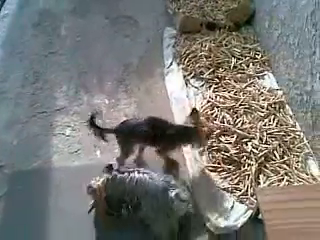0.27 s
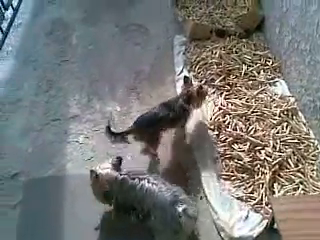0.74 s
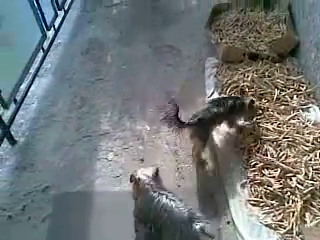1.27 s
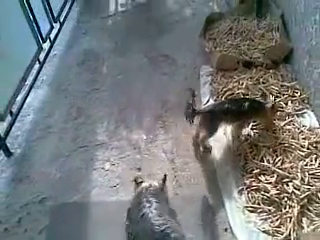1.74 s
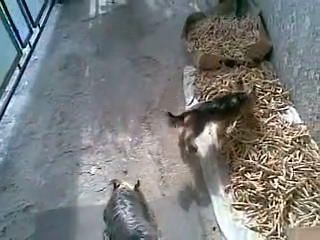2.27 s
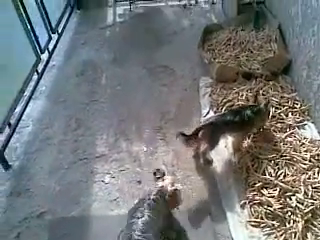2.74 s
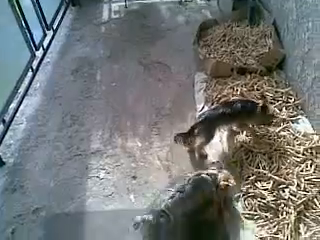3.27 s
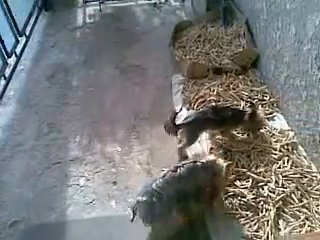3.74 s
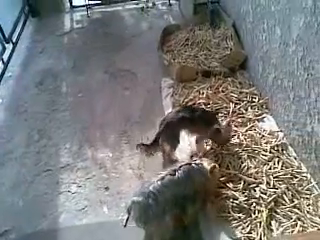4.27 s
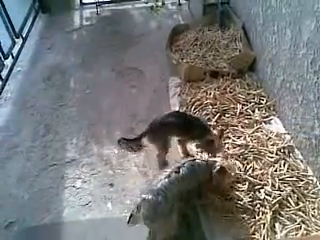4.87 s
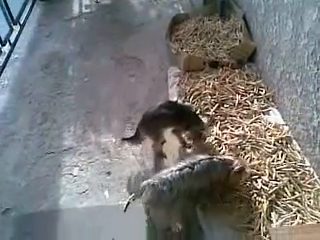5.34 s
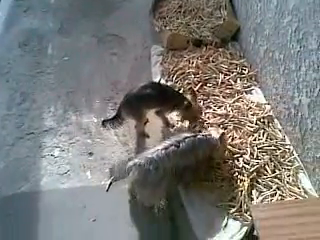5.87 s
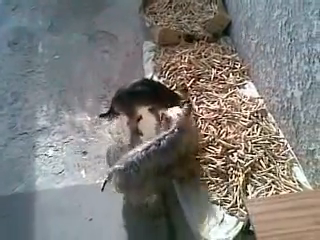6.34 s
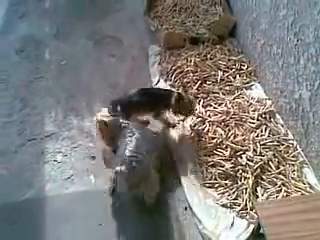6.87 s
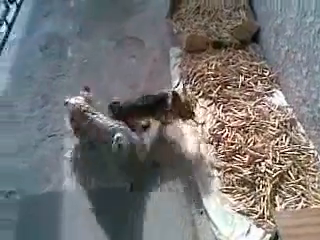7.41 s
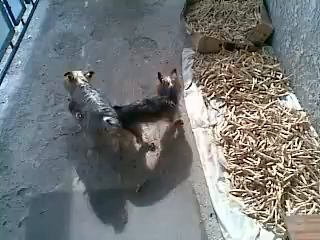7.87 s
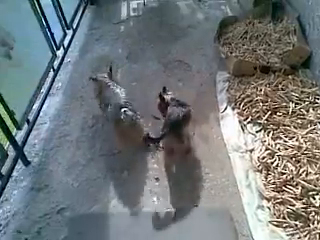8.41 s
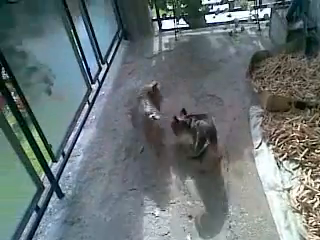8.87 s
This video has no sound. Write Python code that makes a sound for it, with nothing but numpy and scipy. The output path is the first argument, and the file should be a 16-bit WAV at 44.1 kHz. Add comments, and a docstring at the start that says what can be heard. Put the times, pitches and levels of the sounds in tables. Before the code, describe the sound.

Dry pods crackle under sniffing small dogs, with scattered claw clicks and soft paw taps over a faint distant town hum.

```python
"""Dry pods snap and rustle as two small dogs sniff and root in a heap of them on a sack; claws tick, paws tap.
The pods scrape over each other as the dogs nudge them, and each sniff rings in a dog's nose.
We are on a concrete balcony: the walls answer briefly, the town hums far off, and late on come faint
distant pips and a low drone. The mono camera microphone hisses; its gain dips after loud moments."""
import sys
import numpy as np
from scipy import signal
from scipy.fft import rfft, irfft, next_fast_len
from scipy.io import wavfile
from scipy.ndimage import uniform_filter1d, map_coordinates

SR = 44100
rng = np.random.default_rng(int(sys.argv[2]) if len(sys.argv) > 2 else 0)


def materialize(psi):
    """Save the field psi as 16-bit PCM at rate SR to the path in sys.argv[1].

    A 1-D psi becomes a single channel; in a 2-D psi each row is a channel.
    """
    bounded = np.clip(np.atleast_2d(psi).T, -1, 1)
    quanta = np.round(bounded * 32767).astype(np.int16)
    wavfile.write(sys.argv[1], SR, quanta)


N = 402633

# Spectrum of the far town hum and the camera hiss: frequency_hz, density_db
AMBIENCE_SPECTRUM = [(12, -12), (20, 7), (44, 2), (98, -5), (285, -6), (698, -10.5), (1810, -16.5),
                     (3070, -20.5), (3950, -19.5), (6540, -25.5), (9140, -18.5), (14700, -15.5),
                     (16000, -11)]
# Slow drift of that hum and hiss: time_s, gain_db
AMBIENCE_DRIFT = [(0, 0.5), (3, 0), (6, 1), (9.13, 2)]
# Spectrum of pods scraping together: frequency_hz, density_db
RUSTLE_SPECTRUM = [(470, -17.5), (850, -12), (1210, -8), (3600, -4.5), (4290, -3), (7170, -3.5), (7930, 0),
                   (10300, -1), (13600, -15), (15000, -30), (16000, -33)]
# Nasal resonances of the dogs' sniffs, odd modes of a closed tube: pitch_hz, width_hz, level_db
SNIFF_MODES = [(1445, 400, 3), (4400, 1400, -8), (7170, 1200, -5)]
# Faint stirring and sniffing between the louder moments: time_s, rustle_db, sniff_db
STIRRING = [(0, -53.5, -66), (1.4, -54, -78), (1.6, -60, -59), (5, -59, -75), (6.4, -75, -60.5),
            (7, -55, -77), (7.3, -52.5, -78), (8.1, -51, -75), (8.4, -55, -53.5), (9.13, -52, -55.5)]
# A dog sniffs, snorts or nudges the pods: peak_s, rustle_db, rise_s, fall_s, sniff_db
SNIFFS_AND_NUDGES = [(1.575, -43, 0.03, 0.061, -53), (1.69, -38.5, 0.076, 0.069, -61),
                     (1.84, -36.5, 0.066, 0.065, -46.5), (2.0, -40.5, 0.15, 0.093, -48.5),
                     (2.07, -42.5, 0.057, 0.057, -65), (2.19, -39.5, 0.094, 0.23, -51),
                     (2.38, -41.5, 0.081, 0.39, -49.5), (2.53, -42.5, 0.09, 0.06, -60),
                     (2.64, -45.5, 0.044, 0.13, -68), (2.845, -37, 0.1, 0.088, -61),
                     (2.98, -37.5, 0.077, 0.082, -61), (3.11, -43, 0.099, .2, -61),
                     (3.225, -38, 0.18, 0.11, -61), (3.511, -32, 0.14, 0.14, -48.5),
                     (3.598, -25.5, 0.024, 0.057, -55), (3.69, -35, 0.13, 0.049, -50),
                     (3.747, -25, 0.013, 0.049, -52), (3.796, -19.5, .02, .1, -43),
                     (3.845, -19, 0.066, 0.043, -38), (3.89, -31.5, .04, 0.14, -44),
                     (4.06, -48.5, .05, 0.11, -51), (4.16, -38, 0.14, .1, -54),
                     (4.275, -30, 0.052, 0.048, -49), (4.43, -39.5, 0.18, 0.068, -42.5),
                     (4.52, -35.5, 0.11, 0.083, -44.5), (4.71, -38, 0.2, 0.18, -53),
                     (4.79, -37.5, .1, 0.086, -56), (4.911, -29, 0.12, 0.078, -52),
                     (5.04, -39.5, .15, 0.15, -51), (5.2, -44.5, 0.087, 0.36, -48),
                     (5.37, -41, 0.35, .08, -65), (5.55, -42.5, 0.16, 0.13, -50),
                     (5.641, -36.5, 0.057, 0.18, -43), (5.78, -43.5, 0.081, .2, -48.5),
                     (5.971, -35.5, .17, 0.096, -44), (6.08, -42.5, .1, 0.093, -46.5),
                     (6.2, -40.5, .06, 0.12, -48), (6.26, -34.5, 0.096, .12, -46),
                     (6.4, -38, 0.11, 0.097, -45), (6.445, -33.5, 0.042, 0.052, -47),
                     (6.54, -39, 0.13, 0.077, -54), (6.705, -29.5, .07, 0.056, -59),
                     (6.645, -38.5, 0.043, .1, -61), (6.79, -40.5, .1, 0.22, -50),
                     (6.9, -48, 0.027, 0.074, -57), (7.08, -38.5, 0.028, 0.061, -65),
                     (7.56, -40, 0.035, 0.083, -43), (7.61, -46, .04, 0.033, -44),
                     (7.68, -39, 0.029, 0.037, -55), (7.8, -41.5, 0.014, 0.041, -66),
                     (7.94, -47.5, 0.034, .1, -58), (8.15, -39.5, 0.025, 0.093, -60),
                     (8.25, -34, 0.022, 0.067, -46.5), (8.335, -41, 0.022, 0.045, -41.5),
                     (8.37, -36, 0.054, 0.15, -43), (8.45, -38.5, .05, 0.051, -56),
                     (8.538, -29, 0.05, 0.12, -54), (8.686, -36, .033, 0.08, -40),
                     (8.88, -32, 0.027, 0.043, -47), (8.84, -46, 0.27, 0.11, -58),
                     (9.11, -47.5, 0.37, 0.041, -60)]
# Pod snaps and claw ticks: start_s, peak_db, low_ring_hz, low_ring_db, high_ring_hz, high_ring_db, tail_db
SNAPS_AND_TICKS = [(.1515, -30, 2120, -7, 5500, 3, -6), (.1625, -33, 2100, 11, 5540, -8, -8),
                   (.3999, -24, 2200, -7, 5440, 1.5, -5.5), (0.5094, -40, 2220, 16, 3880, 0, -12),
                   (.58, -23.5, 1390, -6, 8800, 2, -9), (0.812, -33, 2410, -6, 8850, 19, -15),
                   (.885, -35, 1500, -6, 9500, -4, -6), (0.949, -24.5, 1660, -6, 4030, -2, -3),
                   (1.016, -34, 2280, 10, 4050, 11, -7), (1.065, -24.5, 1970, -7, 7560, -25, -2),
                   (1.293, -35, 1730, 8, 8600, -4, -7), (1.5545, -34, 1840, 5, 9050, 0, 7),
                   (1.651, -18, 1770, -2, 3100, 0, -8.5), (1.68, -32, 1720, 10, 3160, 8, 2),
                   (1.792, -27, 1330, -8, 9510, -4, -10), (1.9539, -31.5, 1890, -3, 3670, 13, -6),
                   (2.359, -29, 1260, 10, 8960, 2, -4), (2.836, -22.5, 1870, 5.5, 3200, 4, -14),
                   (2.977, -27, 2280, -4, 8650, 3, 0), (3.46, -24, 1750, -3, 8700, 17, 0),
                   (3.591, -11, 2410, -10, 9100, -2, -2), (3.7373, -5, 2220, -16, 8000, -21, -4),
                   (3.741, -4, 1280, -5, 7060, -8, -21), (3.7793, -8.5, 1430, -16, 8340, 8, -3),
                   (3.7842, -4.5, 2200, -9, 9900, 10, -5), (3.7914, -7, 1810, -3, 9860, 2, -11),
                   (3.7994, -15, 1970, -10, 9320, 0, -14), (3.8131, -8, 1620, -17, 9100, -8, 4),
                   (3.8172, -2.5, 2160, -12, 7800, -4, -1), (3.885, -17, 2030, -9, 10100, 6, -9),
                   (4.2417, -26, 2100, 11, 8800, 9, -2), (4.4176, -20.5, 1350, -18, 4700, -4, 3),
                   (4.6968, -20.5, 2410, -5, 8010, -4, -6), (4.8343, -20, 1570, 1, 5100, 0, -1),
                   (5.0323, -25, 1310, -11, 9940, -7, 8), (5.154, -27.5, 1480, -21, 8650, 7, 3),
                   (5.199, -30.5, 1360, -1, 8150, -2, 5), (5.623, -27, 1480, -14, 6600, -3, 5),
                   (6.3269, -25, 1600, -8, 8500, -2, -2), (6.4311, -19.5, 1180, -2, 5170, 3, -6),
                   (6.6267, -26, 2320, 0, 2900, 1.5, -7), (6.8898, -20.5, 1620, 7.5, 4310, 9.5, -7.5),
                   (7.0667, -30, 1280, -5, 9200, 18, 20), (7.1416, -32.5, 2490, 0, 9300, 2, -4),
                   (7.3052, -27, 2490, -17, 9600, 15, -15), (7.3386, -27.5, 2180, -11, 6100, -5, 2),
                   (7.3656, -29.5, 1850, -14, 9820, -3, 1), (7.3902, -24.5, 1570, -18, 9100, 11, -13),
                   (7.5403, -17.5, 1330, 0, 9040, 3, -10), (7.5484, -19.5, 1820, 15, 6800, 4, -8),
                   (7.5812, -18.5, 1460, 4.5, 4420, 8, -3), (7.6598, -20, 1680, 15, 7300, 4, -13.5),
                   (7.7925, -21, 1900, -6, 3380, -1, -4.5), (7.835, -22, 1870, -23, 9000, 0, -2),
                   (7.838, -16, 1870, -25, 9000, 2, -11), (7.9311, -30, 1800, 2, 3390, 6, -8),
                   (8.1443, -29, 1470, 2, 4770, 3, -14), (8.232, -23.5, 1660, 7, 4370, -4, -1),
                   (8.3411, -22, 1550, 7, 3470, -1, 3), (8.3812, -21.5, 1730, 12, 7370, 17, -5.5),
                   (8.4371, -23, 1820, 11.5, 7140, -1, -14), (8.469, -21, 1670, -30, 9750, 4, -3),
                   (8.496, -28, 1500, -13, 9000, 2, -11), (8.512, -19, 1970, 1, 4140, -1, 15),
                   (8.5235, -7, 2070, -10, 4870, -11, -9), (8.552, -23, 2050, -10, 7200, 14, -22),
                   (8.5842, -25, 1480, 7, 2970, -2, 2), (8.6794, -24, 1400, 3.5, 4080, -4, -10),
                   (8.8017, -34, 1330, 6, 4940, 8, -5), (8.8781, -21.5, 2070, 0, 8250, 3, 7),
                   (8.967, -30, 1190, -10, 10300, -1, -7), (8.994, -35.5, 1380, 9, 3610, 10, -9)]
# Dull paw taps: start_s, level_db, pitch_hz, edge_db
PAW_TAPS = [(.976, -29, 1710, 9), (.998, -23, 1260, -2), (1.017, -33, 2320, 9), (1.026, -30, 590, 8),
            (1.169, -26, 880, -6), (1.191, -28.5, 870, -13), (1.229, -36, 2500, -3), (1.326, -29, 594, 8),
            (3.792, -27, 1900, -8), (6.433, -32, 940, 0), (7.66, -31.5, 507, 13), (8.523, -27, 820, 3)]
# Faint pips in the distance: start_s, level_db
FAR_PIPS = [(7.2, -58), (7.325, -47), (7.76, -45.5), (8.02, -44.5), (8.15, -48), (8.27, -54)]
# Decay time of the balcony walls: frequency_hz, t60_s
WALL_DECAY = [(500, 0.22), (3000, 0.094), (12000, 0.034)]


def amp(db):
    """dB to gain."""
    return 10 ** (np.asarray(db) / 20)


def unit(x):
    """Scaled to rms 1."""
    return x / np.sqrt(np.mean(x ** 2) + 1e-20)


def along(points, hz):
    """Interpolate (frequency_hz, value) points on a log frequency axis."""
    point_hz, values = np.transpose(points)
    return np.interp(np.log(hz + 1), np.log(point_hz + 1), values)


def curves(rows):
    """One value per sample for each column after the time."""
    time_s, *columns = np.transpose(rows)
    return [np.interp(np.arange(N) / SR, time_s, column) for column in columns]


def wobble(rate_hz):
    """A smooth random curve with rate_hz knots a second."""
    knots = rng.standard_normal(int(N * rate_hz / SR) + 4)
    return map_coordinates(knots, [np.arange(N) * rate_hz / SR])


def filtered(x, response):
    """x through a complex frequency response."""
    size = next_fast_len(x.shape[-1] + 4096)
    return irfft(rfft(x, size) * response(np.fft.rfftfreq(size, 1 / SR)), size)[..., :x.shape[-1]]


def mode(f, hz, width_hz):
    """One resonance, gain 1 at its centre."""
    return 1j * f * width_hz / (hz * hz - f * f + 1j * f * width_hz)


def patchy(depth_db):
    """White noise with patches of random gain across time and frequency."""
    spectrum = signal.stft(rng.standard_normal(N), nperseg=256)[2]
    patches = uniform_filter1d(rng.standard_normal(spectrum.shape), size=5, axis=0)
    patches = uniform_filter1d(patches, size=12, axis=1)
    return unit(signal.istft(spectrum * amp(depth_db * unit(patches)), nperseg=256)[1][:N])


def ambience(level_db=-47.5):
    """The bed under everything: far town hum and camera hiss, drifting slowly in level."""
    bed = unit(filtered(patchy(depth_db=1.5), lambda f: amp(along(AMBIENCE_SPECTRUM, f))))
    return amp(level_db + curves(AMBIENCE_DRIFT)[0]) * bed


def rooting_gains(drop_db=18.5, roundness=1.23):
    """Rustle and sniff gains: each sniff or nudge swells and dies, adding power to the faint stirring."""
    t = np.arange(-SR, SR) / SR
    power = np.pad(amp(curves(STIRRING)) ** 2, ((0, 0), (SR, SR)))
    for peak_s, rustle_db, rise_s, fall_s, sniff_db in SNIFFS_AND_NUDGES:
        from_peak = np.where(t < 0, -t / rise_s, t / fall_s)
        level_db = np.array([[rustle_db], [sniff_db]]) - drop_db * from_peak ** roundness
        power[:, round(peak_s * SR):][:, :len(t)] += amp(level_db) ** 2
    return np.sqrt(power[:, SR:SR + N])


def pod_crackle(per_second, decay_cycles, spread_db):
    """Tiny cracks at random moments, each a damped sine of its own pitch and size."""
    when, pitch, strength = np.hsplit(rng.random((int(per_second * N / SR), 3)), 3)
    age = np.arange(160)  # samples
    hz = 1100 * (12000 / 1100) ** pitch
    size = amp(spread_db * np.minimum(-np.log(strength + 1e-9), 3)) * np.sqrt(hz)
    cracks = size * np.sin(2 * np.pi * hz * age / SR) * np.exp(-age * hz / (SR * decay_cycles))
    positions = (when * N).astype(int) + age
    return unit(np.bincount(positions.ravel(), cracks.ravel())[:N])


def pod_rustle():
    """Pods slide over each other: a hiss of tiny scrapes and cracks."""
    scrape = patchy(depth_db=2.5) + amp(-4.5) * pod_crackle(per_second=2500, decay_cycles=5.9, spread_db=2)
    scrape *= amp(1.83 * wobble(rate_hz=70))
    return unit(filtered(scrape, lambda f: amp(along(RUSTLE_SPECTRUM, f))))


def sniffing():
    """Air rushes through a dog's nose and rings its resonances."""
    nose = lambda f: sum(amp(db) * mode(f, hz, width) ** 2 for hz, width, db in SNIFF_MODES)
    return unit(filtered(patchy(depth_db=6.5), nose))


def snaps_and_ticks(crack_delay_s=0.0012, crack_t60_s=0.007, crumble_t60_s=0.13):
    """A sharp crack of pod or claw just after first contact, then a crumbling tail, through two rings."""
    out, t = np.zeros(N + SR), np.arange(SR // 4) / SR
    crack = amp(-60 * (t - crack_delay_s) / crack_t60_s) * (t > crack_delay_s)
    for start_s, peak_db, low_hz, low_db, high_hz, high_db, tail_db in SNAPS_AND_TICKS:
        crumbs = rng.standard_normal(len(t)) * amp(2 * rng.standard_normal(len(t)))
        tail = amp(tail_db - 60 * t / crumble_t60_s) * (1 - np.exp(-t / 0.0023))
        body = lambda f: (amp(-11) * mode(f, 7860, width_hz=8400) ** 4
                          + amp(high_db) * mode(f, high_hz, width_hz=420)
                          + amp(low_db) * mode(f, low_hz, width_hz=400) ** 2)
        bare_crack = filtered(crumbs * crack, lambda f: mode(f, 6700, width_hz=9600) ** 3)
        snap = filtered(crumbs * (crack + tail), body) + amp(-6.5) * bare_crack
        out[round(start_s * SR):][:len(t)] += amp(peak_db) * snap / np.abs(snap).max()
    return out[:N]


def balcony_walls(x, delay_samples=200):
    """Short reflections off the concrete around the microphone; the treble dies first."""
    hz, t, noise = signal.stft(rng.standard_normal(SR // 2), SR, nperseg=256)
    decay = amp(-60 * t / along(WALL_DECAY, hz)[:, None])
    tail = signal.istft(noise * decay, SR, nperseg=256)[1]
    return signal.fftconvolve(np.pad(x, (delay_samples, 0)), tail / np.linalg.norm(tail))[:N]


def paw_taps(thud_t60_s=0.0098, edge_t60_s=0.0035, edge_hz=1800):
    """A paw lands softly: a few cycles of dull thud behind a short hard edge."""
    out, t = np.zeros(N), np.arange(SR // 20) / SR
    attack = 1 - np.exp(-t / 0.00046)
    for start_s, level_db, pitch_hz, edge_db in PAW_TAPS:
        thud = amp(-60 * t / thud_t60_s) * np.sin(2 * np.pi * pitch_hz * t)
        edge = amp(edge_db - 60 * t / edge_t60_s) * np.sin(2 * np.pi * edge_hz * t)
        out[round(start_s * SR):][:len(t)] += amp(level_db) * attack * (thud + edge)
    return out


def far_pips(pitch_hz=745, t60_s=0.17, attack_s=0.0081):
    """Short soft tones on one pitch, a long way from the microphone."""
    out, t = np.zeros(N), np.arange(SR // 5) / SR
    envelope = amp(-60 * t / t60_s) * (1 - np.exp(-t / attack_s))
    for start_s, level_db in FAR_PIPS:
        out[round(start_s * SR):][:len(t)] += amp(level_db) * envelope * np.sin(2 * np.pi * pitch_hz * t)
    return out


def late_drone(full_at_s=8.85, rise_s=0.021, level_db=-53):
    """A low, narrow band of noise that sets in just before the end."""
    drone = unit(filtered(rng.standard_normal(N), lambda f: mode(f, 533, width_hz=210) ** 2))
    fade_in = np.clip((np.arange(N) / SR - full_at_s) / rise_s + 1, 0, 1)
    return amp(level_db) * fade_in * drone


def scene():
    """The balcony as it reaches one microphone, the same on both channels."""
    hits = snaps_and_ticks() + paw_taps() + far_pips()
    rustle_gain, sniff_gain = rooting_gains()
    rooting = rustle_gain * pod_rustle() + sniff_gain * sniffing()
    reflections = balcony_walls(amp(-14.5) * hits + amp(-13) * rooting)
    mono = rooting + hits + reflections + ambience() + late_drone()
    return np.array([mono, mono])


def record(dry, knee_db=-36, slope=0.33, averaging_s=0.85, hiss_db=-58, cutoff_hz=15830):
    """The camera lowers its gain with the recent power, adds steady hiss and cuts the top treble."""
    memory = np.exp(-1 / (averaging_s * SR))
    recent_power = signal.lfilter([1 - memory], [1, -memory], dry[0] ** 2)
    gain = (1 + recent_power / amp(2 * knee_db)) ** (-slope / 2)
    hiss = amp(hiss_db) * unit(filtered(rng.standard_normal(N), lambda f: f / (f + 6000)))
    return filtered(dry * gain + hiss, lambda f: f < cutoff_hz)


dry = scene()
out = record(dry)
materialize(out)
```